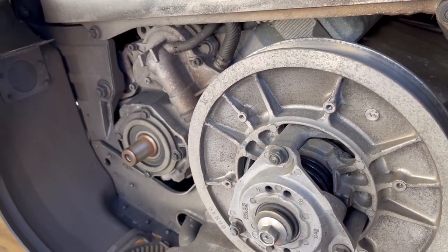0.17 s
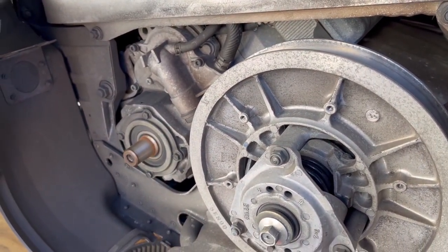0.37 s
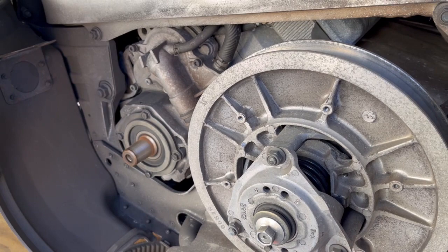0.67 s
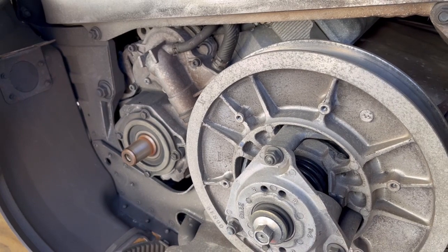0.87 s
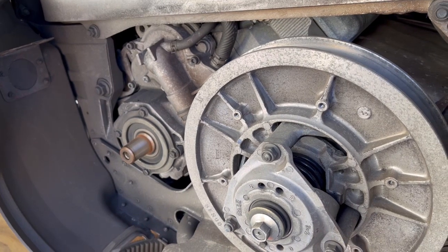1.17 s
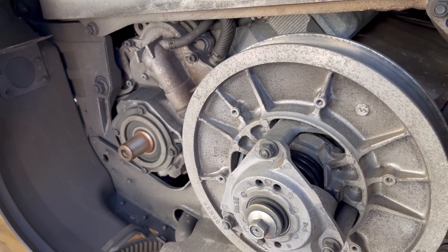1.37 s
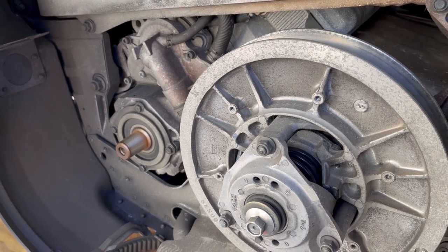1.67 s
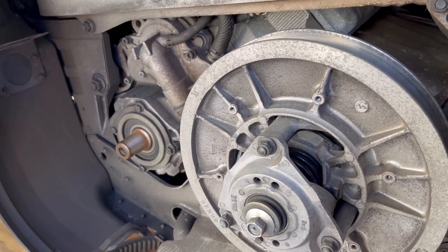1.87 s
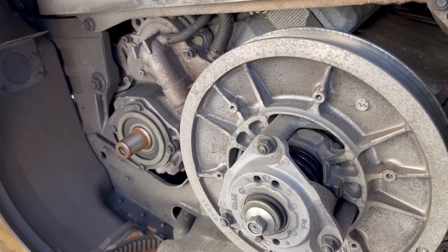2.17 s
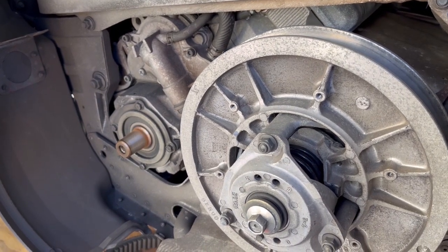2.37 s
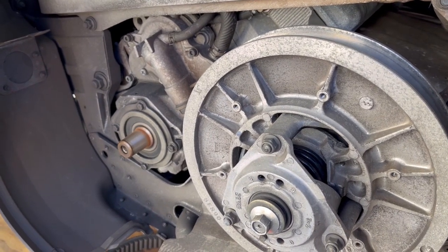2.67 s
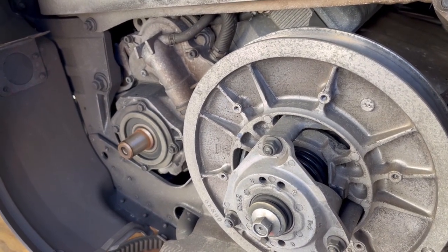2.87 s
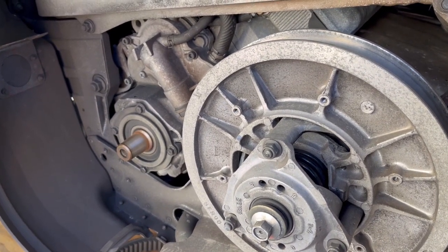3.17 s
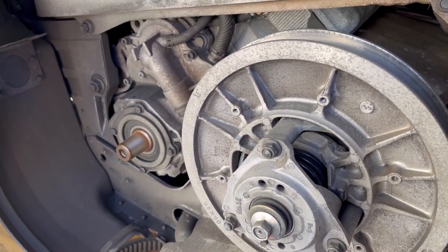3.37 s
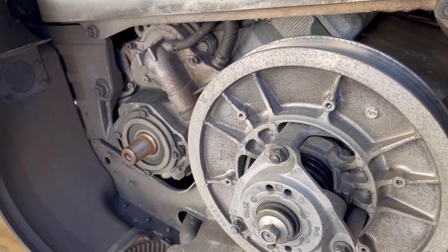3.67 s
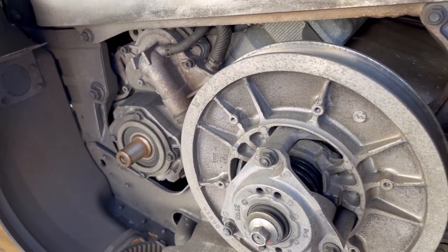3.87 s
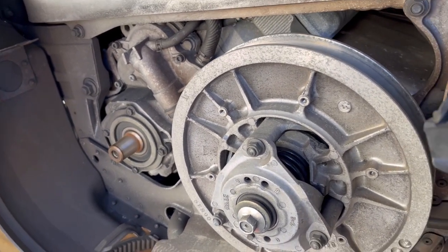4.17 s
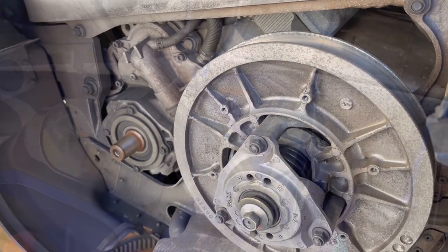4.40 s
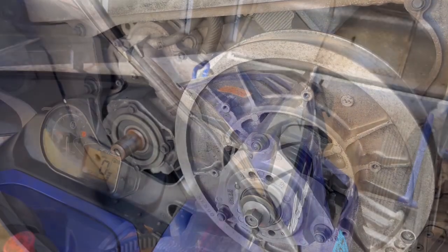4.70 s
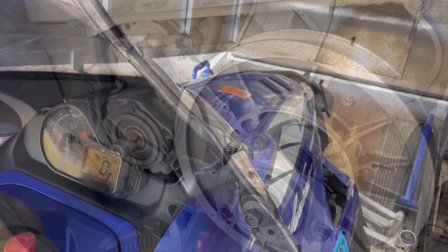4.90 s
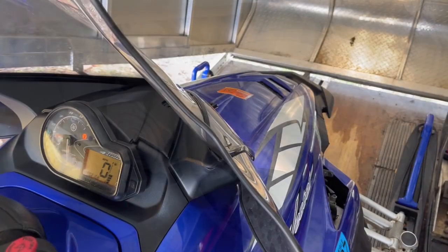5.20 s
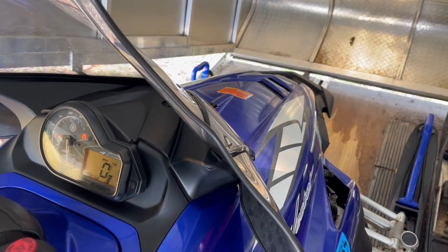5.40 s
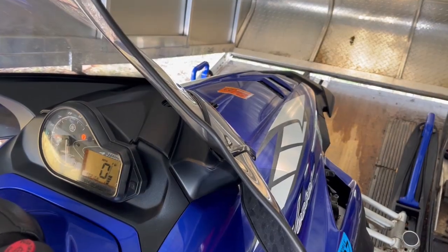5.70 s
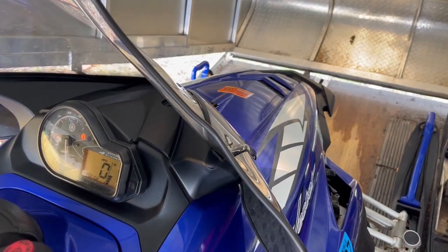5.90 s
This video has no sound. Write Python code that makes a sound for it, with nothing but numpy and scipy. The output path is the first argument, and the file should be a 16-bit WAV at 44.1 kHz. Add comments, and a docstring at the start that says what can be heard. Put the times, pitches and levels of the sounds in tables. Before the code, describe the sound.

Steady but lumpy engine idle at close range in open air, bright with valve ticks, rattling clutch parts and short mid-pitched whine bursts over a firm hum. Thuds come unevenly, some much heavier. After nearly five seconds there is a hard cut with a tiny silence, and the sound becomes darker and bigger: low bass swells about seven times a second, with muffled rumble and panel chatter in a closed trailer.

```python
"""A three-cylinder four-stroke snowmobile idles outdoors, heard close to its open clutch: a drone of engine orders,
a lumpy exhaust thump, tooth-mesh whine in bursts and mechanical clatter. Orders, whine and clatter share one
unsteady crank phase; noise and random contacts ring the casing. After a very short near-silent gap comes the idle
inside an enclosed trailer: a low swept sine booms in throbs over noise shaped into rumble and a dull panel rattle."""
import sys
import numpy as np
from scipy import signal
from scipy.fft import rfft, irfft
from scipy.io import wavfile

SR = 44100
rng = np.random.default_rng(int(sys.argv[2]) if len(sys.argv) > 2 else 0)


def dump(signal):
    """Clip the signal to [-1, 1] and save it as 16-bit WAV at the path in sys.argv[1]."""
    limited = np.clip(np.atleast_2d(signal).T, -1, 1)
    pcm = np.round(limited * 32767).astype(np.int16)
    wavfile.write(sys.argv[1], SR, pcm)


N = 266672
TIME = np.arange(N) / SR
FREQS = np.fft.rfftfreq(N, 1 / SR)

CUT_OUT_S, CUT_IN_S, FADE_IN_S, FADE_OUT_S = 4.773, 4.816, .001, .008
CUTOFF_HZ = 15500
CYLINDERS = 3
THUD_AT_CYCLE, THUMP_ORDER = .43, 3.5   # place in the cycle 0-1; multiple of the cycle rate
HALF_LEFT_RIGHT = np.array([[.5], [-.5]])

# throbs of the trailer air: start_s, end_s, peak_rms_db, pitch_hz
THROBS = [(4.772, 4.888, -17.3, 78.4), (4.915, 5.024, -18, 75), (5.018, 5.148, -18.3, 73),
          (5.148, 5.328, -15.6, 74), (5.338, 5.44, -17.5, 73.8), (5.455, 5.618, -18.3, 75.5),
          (5.635, 5.767, -17.2, 75.8), (5.768, 5.885, -16.8, 76.3), (5.905, 6.018, -17, 74.75),
          (6.007, 6.09, -22, 78)]


def from_db(db):
    """Decibels to gain."""
    return 10 ** (np.asarray(db) / 20)


def rms_one(x):
    """Scale to unit rms."""
    return x / np.sqrt(np.mean(x ** 2) + 1e-20)


def in_time(rows):
    """Each column of a time table, interpolated at every sample."""
    s, *columns = np.transpose(rows)
    return [np.interp(TIME, s, column) for column in columns]


def over_hz(points):
    """A spectrum table at every frequency, joined on a log axis."""
    hz, value = np.transpose(points)
    return np.interp(np.log(FREQS + 1e-9), np.log(hz), value)


def pan(balance_db):
    """Left and right gains for a left-right level difference."""
    return from_db(HALF_LEFT_RIGHT * balance_db)


def drift(rate_hz):
    """Low-passed noise with a spread of 1."""
    spectrum = rfft(rng.standard_normal(N))
    return rms_one(irfft(spectrum / (1 + (FREQS / rate_hz) ** 2), N))


def during(start_s, end_s):
    """Gate between two times: a sharp start and a very short fade."""
    fade_in = np.clip((TIME - start_s) / FADE_IN_S, 0, 1)
    fade_out = np.clip((end_s - TIME) / FADE_OUT_S, 0, 1) ** 2
    return fade_in * fade_out


def coloured(drive, spectrum, likeness, modes=(), balance_db=0):
    """Two unrelated excitations through a resonant body to two microphone ports; rms 1."""
    # arrival at the ports: frequency_hz, left_lead_rad
    port_lead = [(100, 0), (700, -.7), (1150, -.6), (1450, -2.1), (1620, -2.4), (1780, .4), (2600, .6),
                 (4500, .2), (6200, -1.2), (8200, -3.1), (11500, -6.2), (15000, -8.5)]
    mid, side = rfft(drive)
    alike = np.clip(over_hz(likeness), -.99, .99)
    pair = np.sqrt(1 + alike) * mid + np.sqrt(1 - alike) * side * [[1], [-1]]
    pair[0] *= np.exp(1j * over_hz(port_lead))
    power = pan(balance_db) ** 2
    for hz, width_hz, db, side_db in modes:
        peak = from_db(db) * pan(side_db) / (1 + (2 * (FREQS - hz) / width_hz) ** 2)
        power = power + 2 * peak ** 2
    return rms_one(irfft(pair * from_db(over_hz(spectrum)) * np.sqrt(power), N))


def drone(cycle, hum_db, drone_db, firing_rough=0.032, uneven_rough=0.11):
    """Firing harmonics line up into pulses, rougher as they go up; unequal cylinders add restless orders between."""
    # engine orders: multiple_of_cycle_rate, relative_level_db, left_right_db, left_lead_rad
    engine_orders = [(3, -35.3, 3.5, 0.2), (4, -36, -2.5, -0.1), (5, -37.1, -0.6, -0.2),
                     (6, -25.0, -2.1, -0.3), (7, -40.7, 0.4, 0.1), (8, -52, 0, 0), (9, -44.5, -1.5, 0.7),
                     (10, -44, -2.2, -0.6), (11, -50, 0, 0), (12, -28.1, 4.1, -0.3), (14, -49.0, 2.8, 0.2),
                     (15, -34.1, -1.3, 0.5), (16, -49.7, -0.0, -0.3), (18, -27.8, -0.6, -0.6),
                     (19, -47.6, 2.9, -0.1), (20, -48.0, 0.9, 1.0), (21, -41.9, 0.3, 1.0),
                     (23, -50.9, 3.9, -0.0), (25, -50.5, 5.2, -0.0), (26, -48.3, 7.4, 0.2),
                     (27, -51.6, 0.5, -0.2), (33, -48.0, -4.5, -1.2), (35, -52, 2, 0), (36, -52, 2, 0),
                     (37, -53, 2, 0), (45, -52, 2, -0.5)]
    out = np.zeros((2, N))
    for order, db, side_db, lead_rad in engine_orders:
        firing = order % CYLINDERS == 0
        if order < 2 * CYLINDERS:
            swell_db = 0
        elif order == 2 * CYLINDERS:
            swell_db = hum_db
        else:
            swell_db = drone_db
        if abs(order - THUMP_ORDER) < 1:   # the two lowest orders meet in one soft thud per cycle
            smear_rad = -2 * np.pi * order * THUD_AT_CYCLE - np.pi / 2
        elif firing:   # the silencer delays each harmonic differently, spreading the pulse
            smear_rad = -.9 - .75 * (order / CYLINDERS - 5) ** 2
        else:
            smear_rad = 2 * np.pi * rng.random()
        angle = 2 * np.pi * order * cycle + smear_rad + lead_rad * HALF_LEFT_RIGHT
        rough = firing_rough * order / CYLINDERS if firing else uneven_rough
        tone = (1 + rough * drift(15.5)) * np.cos(angle + rough * drift(4.1))
        level_db = db + swell_db - np.mean(swell_db)
        out += np.sqrt(2) * from_db(level_db) * pan(side_db) * tone
    return out


def exhaust(cycle, pipe_hz=77, section_width_hz=36):
    """Each firing burns a little stronger or weaker, and the difference thuds in the silencer; rms 1."""
    fires = np.diff(np.floor(cycle * CYLINDERS), prepend=0) > 0
    pulses = fires * rng.choice([-1, 1], N)
    r = np.exp(-np.pi * section_width_hz / SR)
    section = [1, 0, -1, 1, -2 * r * np.cos(2 * np.pi * pipe_hz / SR), r * r]
    return rms_one(signal.sosfilt([section, section], pulses + 1e-18))


def grains(per_s, spread_db):
    """Two streams of tiny random contacts of uneven size; rms 1."""
    hit = rng.random((2, N)) < per_s / SR
    size = from_db(spread_db * rng.standard_normal((2, N)))
    return rms_one(hit * rng.standard_normal((2, N)) * size)


def engine_bay(x, length_s=.02, decay_s=.007, echo_db=-11):
    """Nearby metal walls add a dense scatter of short reflections."""
    age_s = TIME[:round(length_s * SR)]
    echoes = rng.standard_normal((2, len(age_s))) * np.exp(-age_s / decay_s)
    echoes /= np.linalg.norm(echoes, axis=1, keepdims=True)
    return x + from_db(echo_db) * signal.fftconvolve(x, echoes, axes=1)[:, :N]


def clatter(cycle, flicker_db=0.5, grain_db=-8, split_hz=3000, surge_sharpness=9):
    """Clutch parts knock and the valve gear ticks at set places in the cycle; both ring the casing; rms 1."""
    # dull clutch knocks: place_in_cycle (0-1), rise_db
    knocks = [(.03, 1.5), (.38, 2.2), (.53, 1.9), (.8, 1.3)]
    # bright valve gear ticks: place_in_cycle (0-1), rise_db
    valve_ticks = [(.07, 2.1), (.18, 2), (.38, 1.4), (.84, 2)]
    # clatter spectrum: frequency_hz, relative_density_db
    clatter_spectrum = [(12, -30), (25, -11), (60, 4), (170, 1), (480, 2), (650, -1.5), (1200, 0.9),
                        (2050, -4), (2400, -4.5), (3300, -6.5), (4500, -9.5), (7200, -16.5), (10000, -17.5),
                        (13000, -16.5), (15500, -40)]
    # casing and clutch modes: frequency_hz, width_hz, relative_level_db, left_right_db
    casing = [(570, 100, -5, 0), (722, 50, -7.5, -8), (800, 50, -9, 8), (1150, 70, -6, -1),
              (1580, 150, 2.5, -5), (1865, 110, 3.5, 5), (2205, 90, -4, 3), (2580, 170, 0.3, 4),
              (2940, 170, -.5, 6), (3620, 220, 1.3, 0), (3880, 110, -.5, 2), (4170, 80, -4.5, 1),
              (4560, 150, -2, 4), (5300, 1600, -3, 5)]
    # stereo outdoors: frequency_hz, left_right_likeness
    open_likeness = [(60, .96), (300, .88), (600, .57), (1100, .6), (1350, .4), (2000, .6), (4500, .62),
                     (6500, .55), (8500, .75), (12000, .72)]
    # stereo outdoors: frequency_hz, left_right_db
    open_balance = [(100, 13), (550, 5), (750, 1), (1400, 2), (2200, 5.5), (4500, 5), (7000, 0)]
    contacts = rng.standard_normal((2, N)) + from_db(grain_db) * grains(per_s=550, spread_db=-1.0)
    drive = 0
    for surges, band in ((knocks, "low"), (valve_ticks, "high")):
        surge_db = 0
        for place, rise_db in surges:
            nearness = np.cos(2 * np.pi * (cycle - place)) - 1
            surge_db = surge_db + rise_db * np.exp(surge_sharpness * nearness)
        split = signal.butter(3, split_hz, band, fs=SR, output="sos")
        gain = from_db(surge_db + flicker_db * drift(56))
        drive = drive + signal.sosfilt(split, contacts * gain)
    return coloured(engine_bay(drive), clatter_spectrum, open_likeness, casing, over_hz(open_balance))


def whine(cycle, tones, lead_rad=-0.89, flutter=.3, flutter_hz=20, flutter_in_pitch=.8):
    """Meshing teeth sing through clutch resonances, fluttering as the backlash opens and closes; rms 1."""
    # clutch resonances: frequency_hz, width_hz, relative_level_db
    clutch = [(921, 70, 3), (1035, 110, 0)]
    out = np.zeros((2, N))
    for order, db, side_db in tones:
        # real part: loudness; imaginary part: mostly phase
        flutter_pair = drift(flutter_hz) + 1j * flutter_in_pitch * drift(flutter_hz)
        wander = 1 + flutter * flutter_pair / np.sqrt(2)
        angle = 2 * np.pi * order * cycle + lead_rad * HALF_LEFT_RIGHT
        out += from_db(db) * pan(side_db) * np.real(wander * np.exp(1j * angle))
    body = sum(from_db(db) / (1 + 2j * (FREQS - hz) / width_hz) for hz, width_hz, db in clutch)
    return rms_one(irfft(rfft(out) * body, N))


def bursts(rows, rest_db, edge_db=4):
    """Gain of a whine as the drive takes up load in short flat-topped bursts and sheds it again."""
    t = TIME[::100]
    swells = [db - edge_db * np.abs(2 * (t - s) / length_s) ** 3 for s, length_s, db in rows]
    level_db = np.maximum(np.max(swells, axis=0), rest_db)
    return from_db(np.interp(TIME, t, level_db))


def thumps(cycle, thump_s=.09, trim_db=-11):
    """A hard firing lands on the thud of its cycle and rings the silencer for a few swings."""
    # hard firings: middle_s, level_before_trim_db
    hard_firings = [(.21, -27), (.3, -35), (.43, -25), (.481, -27), (.765, -18.5), (.852, -24),
                    (1.222, -26), (1.317, -24), (1.408, -22), (1.499, -27), (1.594, -22.5), (1.685, -17),
                    (1.822, -23.5), (1.916, -31), (2.005, -20), (2.191, -25), (2.285, -20), (2.374, -19),
                    (2.56, -28), (2.749, -11), (2.84, -21), (2.932, -31), (3.025, -27), (3.357, -26),
                    (3.683, -26), (3.913, -26), (4.004, -26), (4.095, -20.5), (4.188, -14), (4.279, -21),
                    (4.375, -21), (4.653, -24)]
    out = np.zeros(N)
    for s, db in hard_firings:
        landing = np.round(np.interp(s, TIME, cycle) - THUD_AT_CYCLE) + THUD_AT_CYCLE
        near = np.abs(TIME - s) < thump_s / 2
        swell = np.cos(np.pi * (TIME[near] - s) / thump_s) ** 2
        ring = np.sin(2 * np.pi * THUMP_ORDER * (cycle[near] - landing))
        out[near] += from_db(db + trim_db) * swell * ring
    return np.sqrt(2) * out


def outdoors():
    """The open engine bay from close by: one crank phase times the drone, exhaust, clatter, whines and thumps."""
    # unsteady idle: time_s, firings_per_s
    speed = [(0.0, 63.4), (0.1, 64.1), (0.46, 65.3), (0.52, 63.8), (0.78, 66.0), (0.96, 64.4), (1.1, 64.9),
             (1.16, 64.0), (1.3, 65.5), (1.36, 65.0), (1.5, 66.5), (1.62, 65.2), (1.68, 65.6), (2.1, 64.7),
             (2.18, 63.9), (2.29, 65.9), (2.41, 63.5), (2.49, 62.8), (2.67, 66.8), (2.83, 64.4),
             (2.89, 65.3), (3.15, 63.4), (3.25, 63.8), (3.41, 65.0), (3.61, 63.8), (3.71, 64.9),
             (3.97, 65.0), (4.15, 66.6), (4.45, 63.6), (4.53, 65.1), (4.63, 64.1), (4.76, 64.8)]
    # low hum at two firings' worth of orders (order 6): time_s, level_db (only its swing about the mean is used)
    hum = [(0.0, -22.5), (0.68, -21), (0.76, -24.5), (1.02, -21.5), (1.52, -23), (2.18, -20.5), (2.41, -20),
           (2.73, -26.5), (2.83, -19.5), (3.63, -19.5), (4.03, -20), (4.15, -24.5), (4.43, -18),
           (4.76, -20.5)]
    # drone above the hum: time_s, level_db (only its swing about the mean is used)
    drone_swell = [(0.0, -24), (.2, -24), (.42, -22.5), (.55, -24), (.72, -23), (.85, -22), (1.12, -23.5),
                   (1.28, -22.5), (1.5, -22), (1.75, -21), (1.93, -21.5), (2.05, -22), (2.18, -23.5),
                   (2.31, -21), (2.45, -23), (2.62, -22), (2.77, -21.2), (2.84, -22), (2.92, -21),
                   (3.12, -23.5), (3.28, -21), (3.55, -22), (3.75, -21.5), (3.95, -20.5), (4.1, -21.5),
                   (4.3, -19.5), (4.38, -22.5), (4.5, -21.5), (4.58, -21.5), (4.67, -22.5), (4.76, -21.5)]
    # tooth-mesh tones, lower pair then upper: multiple_of_cycle_rate, relative_level_db, left_right_db
    mesh = [(42, 14, 2), (43, 4, 9), (47, -8.5, 2), (48, -1.5, 3.5)]
    # lower whine pair: middle_s, length_s, peak_before_trim_db
    low_bursts = [(0.451, 0.098, -33), (0.71, 0.052, -29.5), (0.81, 0.045, -31), (0.875, 0.16, -32.5),
                  (1.109, 0.032, -32), (1.293, 0.061, -34), (1.429, 0.035, -35), (1.497, 0.48, -30.5),
                  (1.656, 0.056, -27.5), (1.792, 0.072, -30), (1.847, 0.07, -31.9), (1.961, 0.06, -29),
                  (2.257, 0.14, -31.5), (2.606, 0.055, -31), (2.703, 0.127, -29.5), (2.77, 0.033, -31),
                  (2.903, 0.069, -30), (3.0, 0.034, -34), (3.412, 0.084, -32), (3.516, 0.041, -31),
                  (3.742, 0.078, -33), (3.892, 0.048, -28), (4.045, 0.052, -26.5), (4.246, 0.26, -28.1),
                  (4.568, 0.069, -30.1), (4.715, 0.04, -31)]
    # upper whine pair: middle_s, length_s, peak_before_trim_db
    high_bursts = [(0.132, 0.061, -31.8), (0.25, 0.025, -29), (0.306, 0.034, -29), (0.442, 0.17, -30),
                   (0.632, 0.035, -30), (0.73, 0.039, -29.3), (0.819, 0.03, -26), (0.902, 0.025, -29),
                   (1.043, 0.054, -31.5), (1.216, 0.045, -27.5), (1.281, 0.026, -26), (1.354, 0.44, -31),
                   (1.779, 0.092, -29.5), (1.879, 0.043, -29), (1.968, 0.28, -32), (2.112, 0.039, -28.5),
                   (2.239, 0.039, -28), (2.346, 0.046, -25), (2.473, 0.054, -37), (2.555, 0.029, -42),
                   (2.626, 0.18, -31), (2.799, 0.062, -32.5), (2.896, 0.054, -30), (2.99, 0.034, -30.5),
                   (3.056, 0.034, -31), (3.235, 0.055, -31.6), (3.3, 0.03, -27), (3.406, 0.043, -26.5),
                   (3.478, 0.049, -30.1), (3.733, 0.072, -28.5), (3.844, 0.035, -31), (3.917, 0.028, -28.5),
                   (4.055, 0.089, -28), (4.291, 0.1, -25.8), (4.452, 0.023, -26), (4.564, 0.029, -26.5),
                   (4.633, 0.032, -28), (4.703, 0.054, -30)]
    low_trim_db, high_trim_db, upper_offset_cycles = -4, -2.5, .36
    clatter_start_db, clatter_rise_db_per_s, clatter_share_of_drone = -30, 0.5, 0.19

    (firings_per_s,), (hum_db,), (drone_db,) = map(in_time, (speed, hum, drone_swell))
    cycle = np.cumsum(firings_per_s) / SR / CYLINDERS
    orders = from_db(-0.04) * drone(cycle, hum_db, drone_db)
    mutter = from_db(-37) * exhaust(cycle)
    clatter_db = clatter_start_db + clatter_rise_db_per_s * TIME
    clatter_db = clatter_db + clatter_share_of_drone * (drone_db - drone_db.mean())
    rattling = from_db(clatter_db) * clatter(cycle)
    low_gain = from_db(low_trim_db) * bursts(low_bursts, rest_db=-36.5)
    low_whine = low_gain * whine(cycle, mesh[:2])
    high_gain = from_db(high_trim_db) * bursts(high_bursts, rest_db=-35.5)
    high_whine = high_gain * whine(cycle + upper_offset_cycles, mesh[2:])
    return orders + mutter + rattling + low_whine + high_whine + thumps(cycle)


def throb(start_s, end_s):
    """One half-sine swell from 0 to 1 and back."""
    return np.sin(np.pi * np.clip((TIME - start_s) / (end_s - start_s), 0, 1))


def boom(overtone_db=-18, shape=0.87):
    """The exhaust drives the trailer air at one low, slightly moving note, swelling over seven times a second."""
    hz, = in_time([((start_s + end_s) / 2, hz) for start_s, end_s, _, hz in THROBS])
    angle = 2 * np.pi * np.cumsum(hz) / SR
    # shape below 1 flattens the top of each swell and steepens its ends
    swell = sum(from_db(db) * np.abs(throb(start_s, end_s)) ** shape for start_s, end_s, db, _ in THROBS)
    return np.sqrt(2) * swell * (np.sin(angle) + from_db(overtone_db) * np.sin(2 * angle))


def trailer():
    """Close walls smear the firings into rumble that swells with each throb; panels chatter dully in bursts."""
    # rumble spectrum: frequency_hz, relative_density_db
    rumble_spectrum = [(18, -38), (30, -6), (50, 3.5), (62, -1), (88, -1.5), (110, 0), (145, 0), (195, -.5),
                       (245, -7.5), (335, -1), (400, -5), (470, -18), (800, -57)]
    # rattle spectrum: frequency_hz, relative_density_db
    rattle_spectrum = [(250, -27), (500, -1), (650, -1), (1050, 1), (1500, 1.5), (1900, -5.5), (2250, -6.5),
                       (2600, -10.5), (4700, -17.5), (6200, -25), (10000, -30.5), (13500, -30),
                       (15000, -53)]
    # wall and panel modes: frequency_hz, width_hz, relative_level_db, left_right_db
    panels = [(514, 25, 2, 0), (965, 40, -2, 0), (1020, 25, 3, 3), (1103, 30, 3, 0), (1550, 110, 1, -4),
              (1730, 60, -3, 0), (2200, 50, 0, 0)]
    # stereo in the trailer: frequency_hz, left_right_likeness
    trailer_likeness = [(60, .98), (130, .92), (290, .6), (640, .42), (1400, .2), (3100, .45), (12000, .5)]
    # bursts of panel rattle: peak_s, rise_db
    shakes = [(4.865, 5.5), (4.935, 3.8), (5.04, 2), (5.104, 4), (5.185, 1.5), (5.256, 6.3), (5.365, 3),
              (5.41, 4.8), (5.508, 4), (5.57, 1.3), (5.66, 4), (5.725, 6.5), (5.79, 3.5), (5.86, 2.5),
              (5.95, 3.2), (6.025, 5)]
    rumble_db, rumble_swell_db, rattle_db = -26.5, 1, -33
    shake_rise_s, shake_fall_s = .016, .032
    chatter_per_s, chatter_swing_db = 38, .9

    swell = sum(throb(start_s, end_s) for start_s, end_s, *_ in THROBS)
    rumble = coloured(rng.standard_normal((2, N)), rumble_spectrum, trailer_likeness)
    chatter_angle = 2 * np.pi * chatter_per_s * TIME + 2.0 * drift(5)
    chatter_db = chatter_swing_db * np.cos(chatter_angle) + 0.5 * drift(120)
    contacts = rng.standard_normal((2, N)) * from_db(chatter_db)
    rattle = coloured(contacts, rattle_spectrum, trailer_likeness, panels)
    shake_db = 0
    for s, rise_db in shakes:
        spread_s = np.where(TIME < s, shake_rise_s, shake_fall_s)
        shake_db = shake_db + rise_db * np.exp(-((TIME - s) / spread_s) ** 2)
    rumble_gain = from_db(rumble_db + rumble_swell_db * swell)
    return boom() + rumble_gain * rumble + from_db(rattle_db + shake_db) * rattle


def scene():
    """The two places follow each other with a near-silent gap between, over a very faint hiss."""
    hiss = from_db(-100) * rng.standard_normal((2, N))
    return during(0, CUT_OUT_S) * outdoors() + during(CUT_IN_S, np.inf) * trailer() + hiss


def record(dry):
    """A steep elliptic low-pass cuts the top."""
    return signal.sosfilt(signal.ellip(10, .1, 80, CUTOFF_HZ, fs=SR, output="sos"), dry)


dry = scene()
out = record(dry)
dump(out)
```